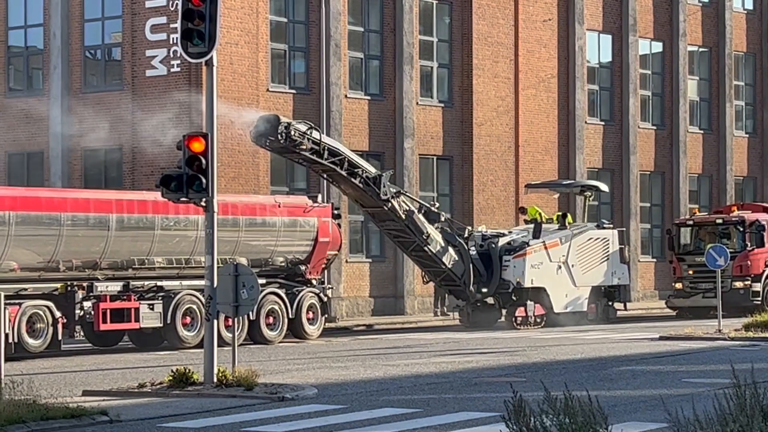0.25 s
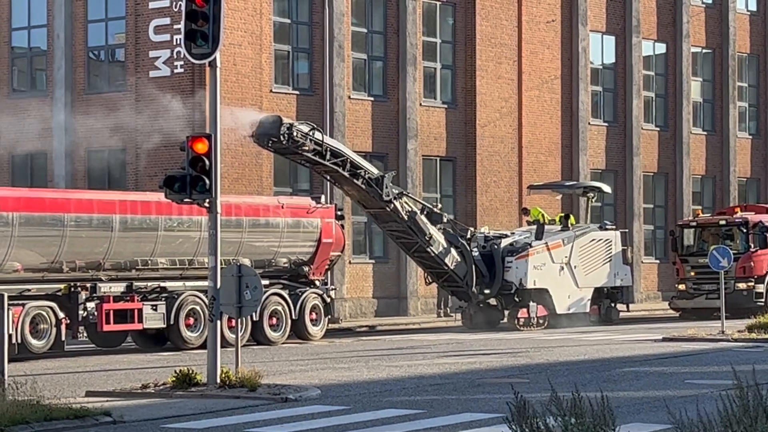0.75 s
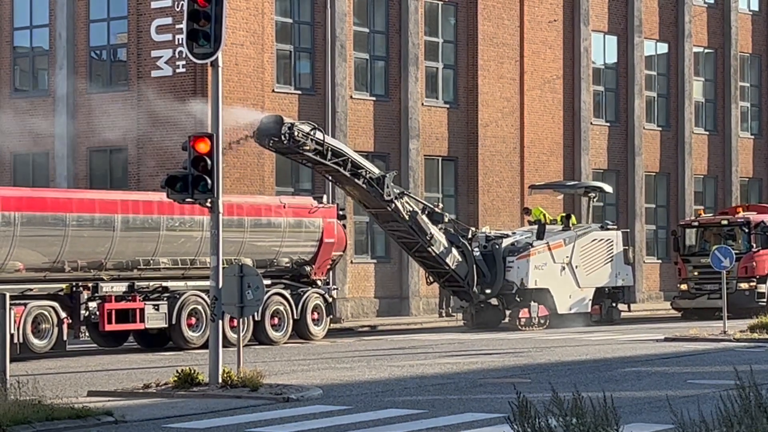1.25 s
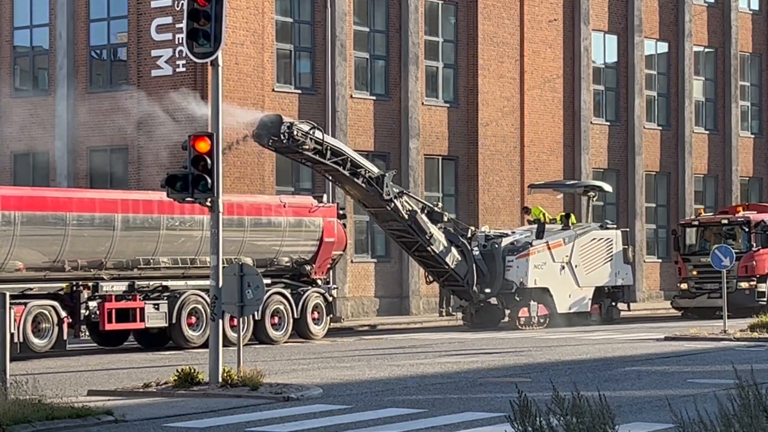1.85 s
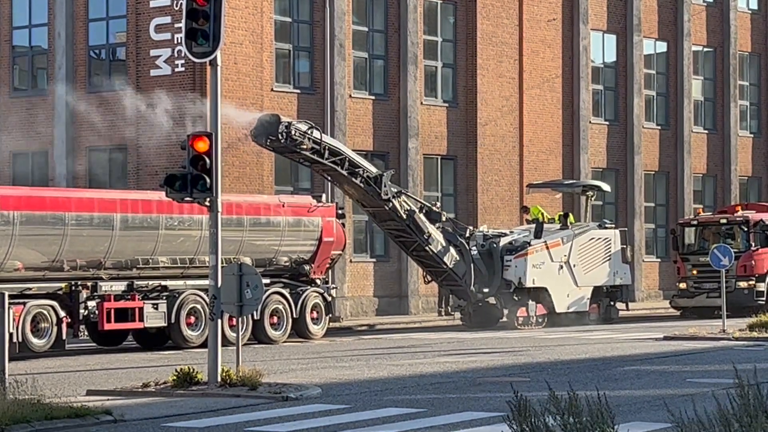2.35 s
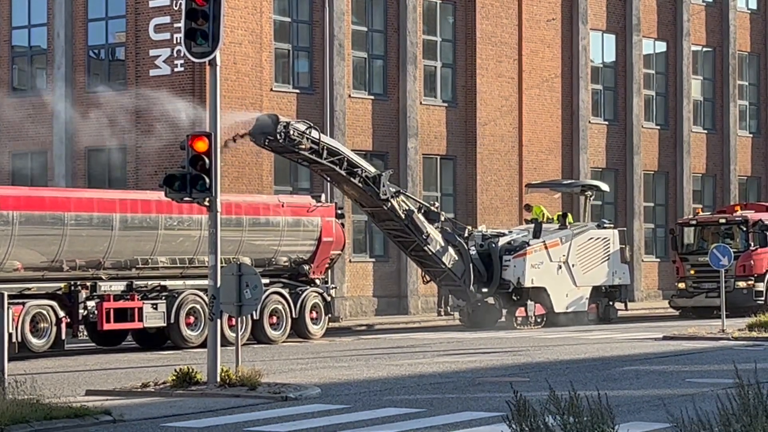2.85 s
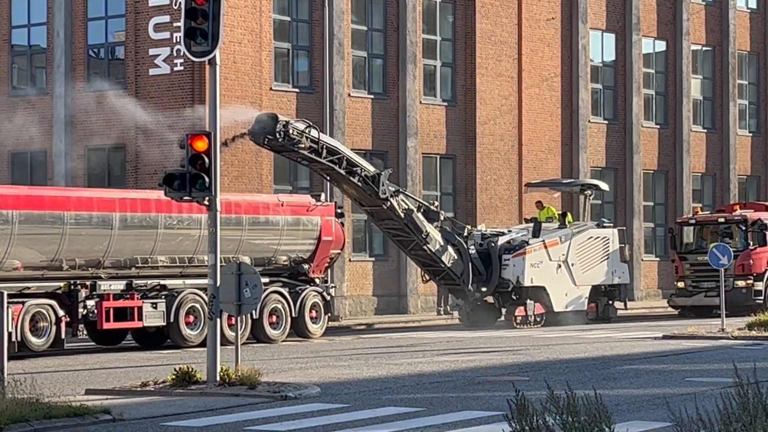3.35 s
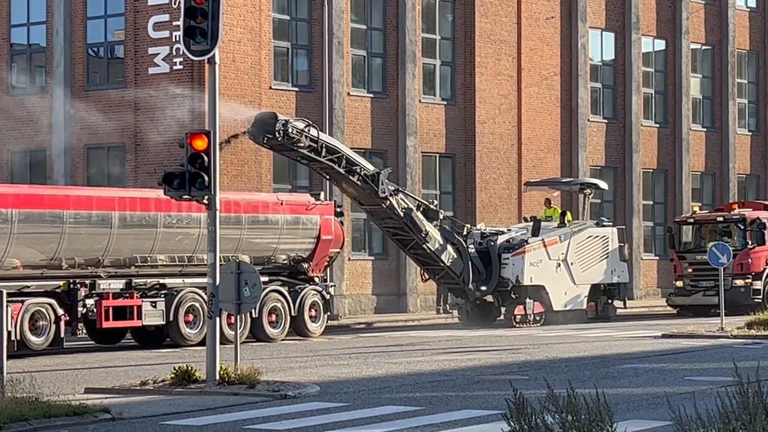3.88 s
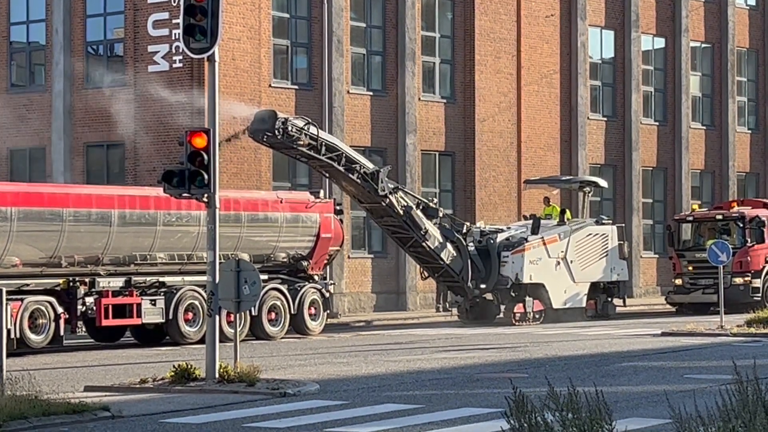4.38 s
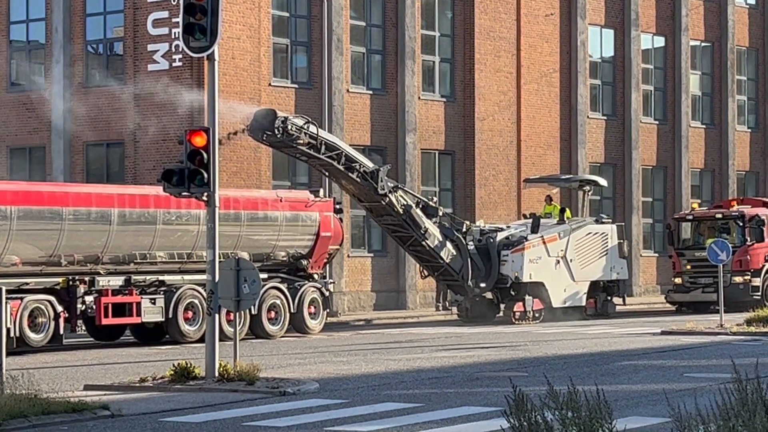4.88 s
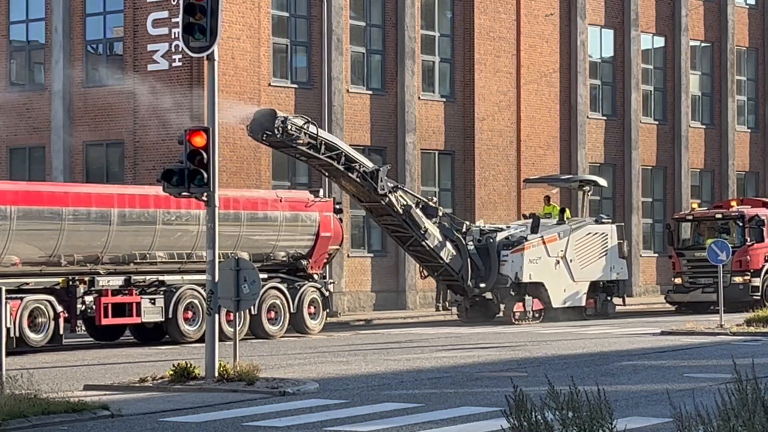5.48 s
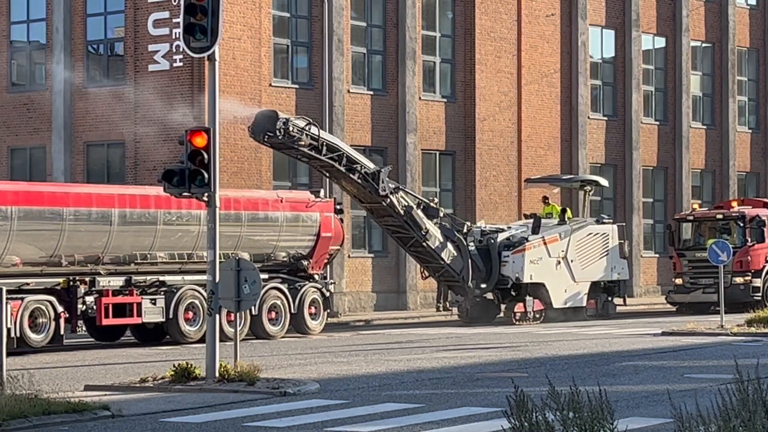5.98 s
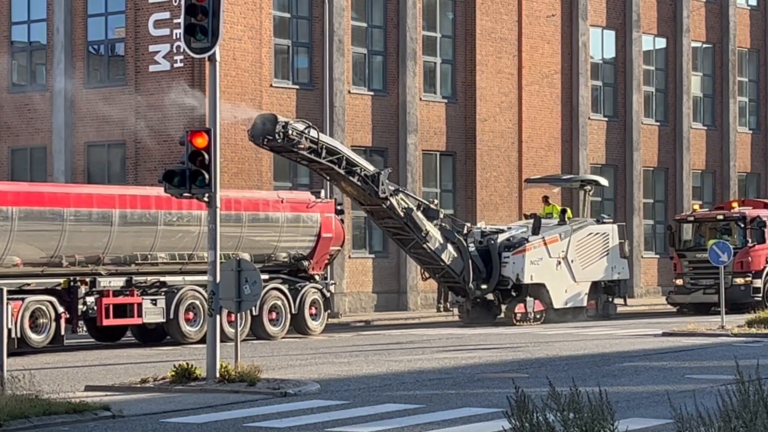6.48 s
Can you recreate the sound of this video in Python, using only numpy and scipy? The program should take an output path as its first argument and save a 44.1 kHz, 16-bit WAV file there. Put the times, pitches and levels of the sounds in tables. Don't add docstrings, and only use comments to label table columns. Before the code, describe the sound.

A road milling machine roars steadily across a junction, diesel droning low, picks grinding asphalt, rubble rattling up the conveyor and stones pinging off steel.

```python
import sys
import numpy as np
from scipy import signal
from scipy.fft import rfft, irfft, next_fast_len
from scipy.io import wavfile
from scipy.ndimage import uniform_filter1d

SR = 44100
rng = np.random.default_rng(int(sys.argv[2]) if len(sys.argv) > 2 else 0)


def wav_record(signal):
    frames = np.transpose(np.atleast_2d(signal))
    bounded = np.clip(frames, -1, 1)
    quanta = np.round(bounded * 32767).astype(np.int16)
    wavfile.write(sys.argv[1], SR, quanta)


def linear_from_db(decibels):
    return 10 ** (np.asarray(decibels, float) / 20)


N = 296787


def evened(x):
    return x / np.sqrt(np.mean(x ** 2) + 1e-20)


def read(points, hz, column=1):
    points = np.array(points)
    return np.interp(np.log(hz + 1), np.log(points[:, 0] + 1), points[:, column])


def sine(cycles):
    return np.sin(2 * np.pi * cycles)


def wander(top_hz, low_hz=0.2987):
    t = np.arange(0, N + 256, 256) / SR
    rates_hz = np.geomspace(low_hz, top_hz, 16)
    slow = sum(sine(f * t + rng.random()) / np.sqrt(f) for f in rates_hz)
    return np.interp(np.arange(N) / SR, t, evened(slow))


def bumps(rows):
    t = np.arange(N) / SR
    return sum(db * np.exp(-(2 * (t - s) / length_s) ** 2) for s, db, length_s in rows)


def receding(mid_db, fall_db_per_s):
    return mid_db - fall_db_per_s * (np.arange(N) - N / 2) / SR


def tone_gain(mid_db, fall_db_per_s, wander_db, humps):
    return linear_from_db(receding(mid_db, fall_db_per_s) + wander_db * wander(6.) + bumps(humps))


def layer_db(mid_db, fall_db_per_s, bite_share):
    # (time [s], level [dB], length [s])
    bites = [
        (.2, 1.8, 0.56),
        (.6, -.8, 0.23),
        (1.9, 1.7, 1),
        (2.75, 1.4, 0.17),
        (3.25, 1, 0.31),
        (5.1, -2.2, .25),
        (5.7, -1.5, 0.85),
        (6.4, .9, 0.85),
    ]
    return receding(mid_db, fall_db_per_s) + bite_share * bumps(bites)


def blows(per_s, spread_db, spectrum, rings=()):
    size = linear_from_db(spread_db * np.minimum(rng.exponential(1, N), 5)) * rng.standard_normal(N)
    train = size * (rng.random(N) < per_s / SR)
    long = next_fast_len(N)
    hz = np.fft.rfftfreq(long, 1 / SR)
    (low_hz, low_db), (high_hz, high_db) = spectrum[0], spectrum[-1]
    skirt_low = [(low_hz * .93, low_db - 30)]
    skirt_high = [(high_hz * 1.07, high_db - 30), (high_hz * 1.2, high_db - 90)]
    colour_db = read(skirt_low + spectrum + skirt_high, hz)
    for ring_hz, width_hz, lift_db in rings:
        colour_db = colour_db + lift_db / (1 + (2 * (hz - ring_hz) / width_hz) ** 2)
    return evened(irfft(rfft(train, long) * linear_from_db(colour_db), long)[:N])


def clinking(x, patchy_db, frames=7):
    z = signal.stft(x, nperseg=512)[2]
    patches = uniform_filter1d(rng.standard_normal(z.shape), size=2, axis=0)
    patches = uniform_filter1d(patches, size=frames, axis=1)
    return evened(signal.istft(z * linear_from_db(patchy_db * evened(patches)), nperseg=512)[1][:N])


def street(x, t60_s=0.47):
    t = np.arange(SR) / SR
    tail = rng.standard_normal(SR) * linear_from_db(-60 * t / t60_s)
    led_in = np.concatenate([x[SR:0:-1], x])
    return signal.fftconvolve(led_in, tail / np.linalg.norm(tail))[SR:SR + N]


def hums():
    # (frequency [Hz], level [dB rms], wander [dB])
    steady = [(40.4, -33, 1), (51.8, -36, 3), (81.2, -29.5, 2), (88.8, -33, 3), (121.8, -42, 3),
              (131.2, -28.5, 1.2), (145.3, -39, 3), (187, -41, 3), (304.2, -45, 2), (428.6, -47, 3),
              (477, -49, 3), (892.3, -58, 2)]
    # (time [s], level [dB], length [s])
    firing_dips = [
        (1.85, -2, 0.3),
        (3.296, 0, 0.93),
        (4.0, -19, 0.18),
        (5.8, -8, 0.74),
    ]
    pump_dips = [
        (.05, 3, 0.087),
        (2.7, -6.5, 0.72),
        (3.5, -2.5, 0.3),
        (6.5, -4.5, 0.77),
    ]
    firing_hz, pump_hz = 96.9, 446.1
    t = np.arange(N) / SR
    tones = np.zeros(N)
    for hz, db, drift_db in steady:
        tones += linear_from_db(db + drift_db * wander(3.)) * sine(hz * t + rng.random())
    firing = tone_gain(-23.5, 0.1, 0.44, firing_dips) * sine(firing_hz * t)
    pump = tone_gain(-34, .15, 1.8, pump_dips) * sine(pump_hz * t)
    return np.sqrt(2) * (tones * linear_from_db(receding(0, .4)) + firing + pump)


def squeak():
    hz, end_s, db = 6850, .068, -47.5
    t = np.arange(N) / SR
    gate = np.clip((end_s - t) / .008 + .5, 0, 1)
    return linear_from_db(db) * gate * sine(np.cumsum(hz * (1 + 0.0018 * wander(40.))) / SR)


def stones():
    # (time [s], peak level [dB], ring frequency [Hz])
    strikes = [
        (1.0174, -37, 4060),
        (1.2461, -27.5, 3770),
        (1.9464, -29, 4500),
        (2.2464, -42, 4860),
        (2.646, -40, 4000),
        (3.4474, -36, 3920),
        (3.8127, -45, 4160),
        (5.0284, -38, 4360),
        (6.2464, -40, 4300),
    ]
    out, t = np.zeros(N), np.arange(1300) / SR
    for s, db, hz in strikes:
        band = signal.butter(3, [hz * .62, hz * 1.35], "band", fs=SR)
        grit = evened(signal.lfilter(*band, rng.standard_normal(len(t))))
        at = round(s * SR)
        decay_db = -60 * t / .032
        out[at:at + len(t)] += linear_from_db(db - 1.5 + decay_db) * grit * np.minimum(t / .001, 1)
    return out


def shaft():
    # (time [s], speed [turns/s])
    speed = [(0, 34.2), (.5, 34.1), (.9, 34.4), (1.2, 34.62), (1.6, 34.38), (2.45, 34.4), (2.75, 34.25),
             (3.1, 34.15), (3.4, 34.25), (3.8, 34.53), (4.3, 34.5), (4.8, 34.3), (5.1, 34.45),
             (5.35, 34.37), (5.7, 34.35), (6.15, 34.0), (6.73, 34.1)]
    # (multiple of the shaft [1], level [dB rms])
    orders = [(2, -35), (3, -38), (4, -39), (5, -38), (8, -43), (12, -44), (15, -45), (17, -53), (18, -47),
              (29, -54), (36, -54)]
    # (multiple of the shaft [1], level against the gear whine [dB])
    gear_orders = [
        (54, 0),
        (64, -14),
        (72, -13),
        (81, -10),
        (108, -17),
    ]
    # (time [s], level [dB], length [s])
    pulls = [
        (.9, 3, 0.24),
        (2.256, 6, 0.35),
        (2.787, 10, 0.26),
        (3.758, 10, 0.19),
        (4.85, 7.5, .5),
    ]
    # (time [s], level [dB], length [s])
    lulls = [
        (.1, -8, 0.43),
        (.8, -3, 0.26),
        (1.25, -6.5, 0.27),
        (2.9, -4, 0.29),
        (3.95, -4.5, 0.43),
        (5.1, -10, 0.44),
        (5.95, -1, .3),
    ]
    speed_s, turns_per_s = np.transpose(speed)
    rate = np.interp(np.arange(N) / SR, speed_s, turns_per_s)
    turns = np.cumsum(rate * (1 + .0006 * wander(16.))) / SR
    low, whine = np.zeros(N), np.zeros(N)
    for k, db in orders:
        low += linear_from_db(db + 2.1 * wander(8., low_hz=1.2)) * sine(k * turns + rng.random())
    for k, db in gear_orders:
        whine += linear_from_db(db + 2.9 * wander(40., low_hz=4.)) * sine(k * turns + rng.random())
    exhaust = tone_gain(-36.5, 0.36, 1.8, pulls) * sine(6 * turns)
    return np.sqrt(2) * (low * linear_from_db(receding(2.1, 0.16)) + exhaust + linear_from_db(-44 + bumps(lulls)) * whine)


def drum():
    # (frequency [Hz], density [dB/Hz])
    rumble_spectrum = [(22, -71), (33, -62), (39, -51), (45, -43.5), (62, -42.5), (88, -40), (103, -42),
                       (113, -50), (135, -44), (190, -48), (250, -47.5), (290, -54), (315, -56),
                       (338, -51.5), (370, -56)]
    rasp_spectrum = [(370, -53), (400, -51.5), (470, -53), (620, -56), (720, -60), (830, -64.5),
                     (950, -63.5), (1010, -60.5), (1200, -65.5), (1600, -61), (1750, -63), (1930, -68),
                     (2300, -70.5), (3200, -74.5)]
    rattle_spectrum = [(3200, -73), (3400, -72.5), (3650, -76.5), (4000, -77), (5000, -81), (6000, -85.5),
                       (7000, -88.5), (8000, -91), (8500, -92.5)]
    fizz_spectrum = [(8500, -92.5), (9500, -95.4), (11000, -99), (12000, -100.7), (13000, -102.6),
                     (14000, -104), (15300, -106)]
    # (frequency [Hz], width [Hz], lift [dB])
    panels = [
        (2120, 184, 4.5),
        (2410, 53, 4),
        (2765, 350, 4.5),
    ]
    # (time [s], level [dB], length [s])
    gusts = [
        (1.6, 1.5, .3),
        (2.05, 1.2, .35),
        (2.95, 1, 0.32),
        (4.3, 1.5, .5),
        (5.3, 3.2, .3),
        (5.75, 0, .4),
    ]
    rumble = blows(4000, 1.13, rumble_spectrum)
    rasp = clinking(blows(20000, 0.74, rasp_spectrum, panels), patchy_db=0.97)
    rattle = clinking(blows(30000, 0.69, rattle_spectrum), patchy_db=1.7, frames=21)
    fizz = clinking(blows(36000, .4, fizz_spectrum), patchy_db=2.7)
    rumble_db = layer_db(-22.1, 0.43, 0.27) + 0.48 * wander(27.0)
    rasp_db = layer_db(-28, 0.45, 0.61) + 0.32 * wander(12., low_hz=1.6)
    rattle_db = layer_db(-44, 0.49, 0.66) + 0.22 * wander(25.)
    fizz_db = layer_db(-60.5, 0.6, .7) + bumps(gusts) + .4 * wander(9.)
    return linear_from_db(rumble_db) * rumble + linear_from_db(rasp_db) * rasp + linear_from_db(rattle_db) * rattle + linear_from_db(fizz_db) * fizz


def scene():
    # (frequency [Hz], left lead [rad], likeness [0-1], left-right [dB])
    ports_low = [(60, -.08, .9995, -.3), (170, -.1, .98, -1.6), (260, -.2, .9, -2), (390, -.27, .84, 2.7),
                 (520, -.63, .89, -.5), (670, -.6, .78, -2.3), (820, -.93, .55, 3), (1030, -.26, .8, 0),
                 (1250, -1.4, .45, .8), (1500, -2.7, .45, -3.6), (1635, -3.2, .75, -4.1),
                 (1690, -5.7, .9, -5.4), (2050, -6.14, .9, -3.9), (2300, -6.25, .98, -1.3)]
    ports_high = [(2800, -6.28, .99, -.8), (5200, -6.7, .95, 0), (6700, -6.9, .93, 0), (7000, -7.7, .8, 0),
                  (8000, -9.1, .85, 0), (9000, -9.8, .8, 0), (10000, -10.9, .6, 0), (10500, -11.8, .7, 0),
                  (11000, -12.3, .9, 0), (13000, -12.7, .9, 0), (14000, -14.1, .4, 0)]
    clear = shaft() + hums() + stones() + squeak()
    long = next_fast_len(N)
    hz = np.fft.rfftfreq(long, 1 / SR)
    lead_rad, alike, tilt_db = (read(ports_low + ports_high, hz, column=k) for k in (1, 2, 3))
    lean = np.arccos(alike) / 2
    near = np.cos(lean) * rfft(clear + drum(), long)
    echo = np.sin(lean) * rfft(street(clear) + drum(), long)
    port = linear_from_db(tilt_db / 2) * np.exp(.5j * lead_rad)
    return irfft(np.array([(near + echo) * port, (near - echo) / port]), long)[:, :N]


def low_pass(x):
    return signal.sosfilt(signal.butter(12, 15600, fs=SR, output="sos"), x)


def record(dry):
    # (low edge [Hz], high edge [Hz], jitter of the low edge [Hz])
    no_sum = [(8000, 8950, 130), (14150, SR / 2, 200)]
    no_difference = [(2750, 5250, 220), (5250, 6800, 0), (10520, 13250, 250), (15000, SR / 2, 330)]
    settle_s = .25
    pair = np.array([dry[0] + dry[1], dry[0] - dry[1]]) / 2
    hz, t, z = signal.stft(pair, SR, nperseg=2048)
    for k, bands in enumerate([no_sum, no_difference]):
        for low_hz, high_hz, jitter_hz in bands:
            edge_hz = low_hz + jitter_hz * np.clip(rng.standard_normal(len(t)), -2, 1.5)
            outside = (hz[:, None] < edge_hz) | (hz[:, None] > high_hz)
            z[k] *= outside | ((t < settle_s) & (jitter_hz == 0))
    total, difference = signal.istft(z, SR, nperseg=2048)[1][:, :N]
    return low_pass(np.array([total + difference, total - difference]))


dry = scene()
out = record(dry)
wav_record(out)
```